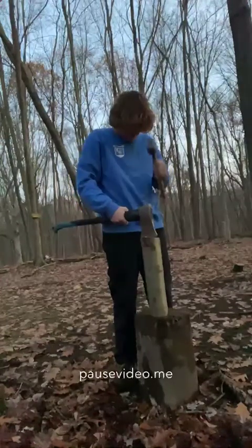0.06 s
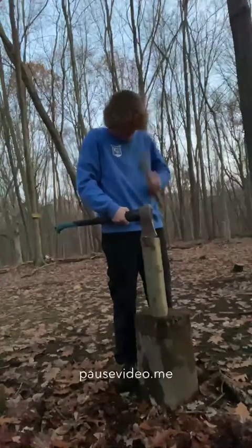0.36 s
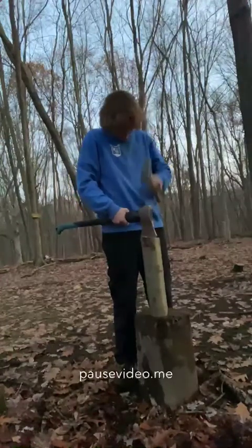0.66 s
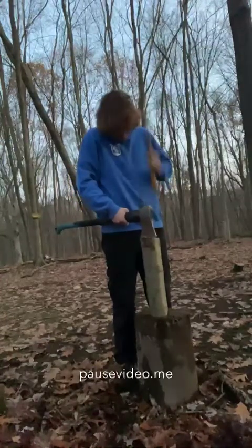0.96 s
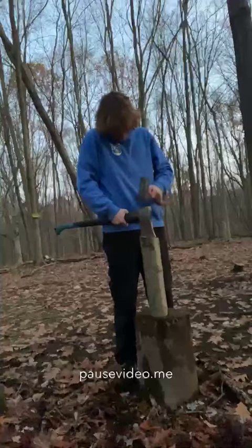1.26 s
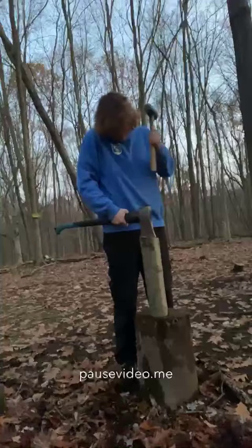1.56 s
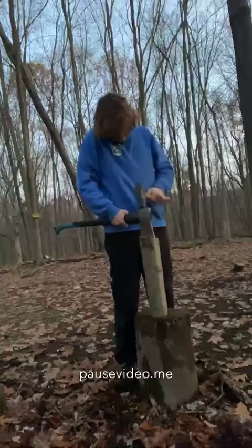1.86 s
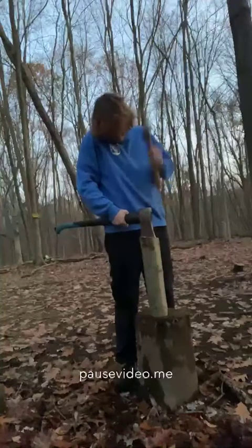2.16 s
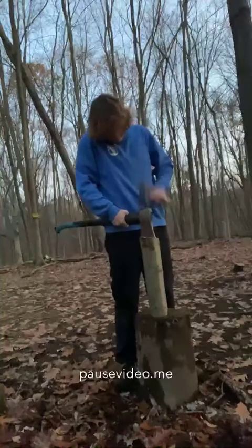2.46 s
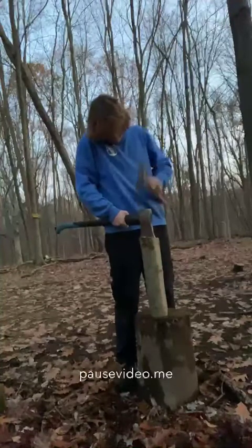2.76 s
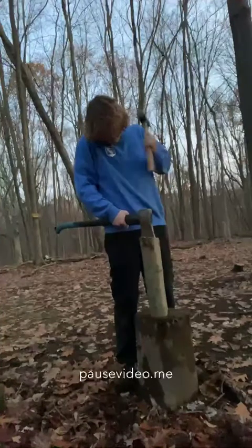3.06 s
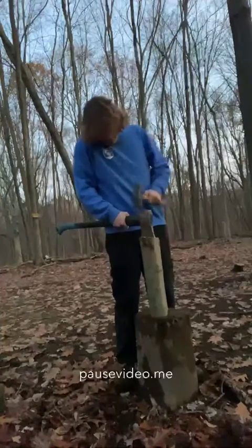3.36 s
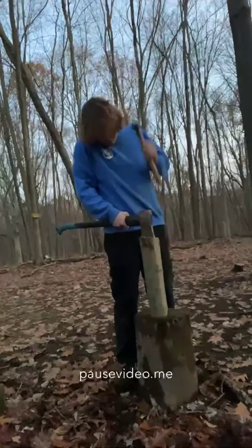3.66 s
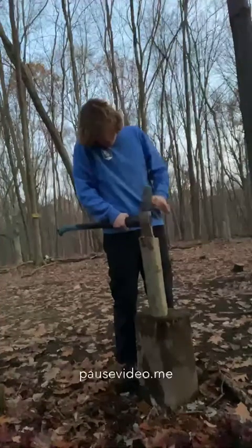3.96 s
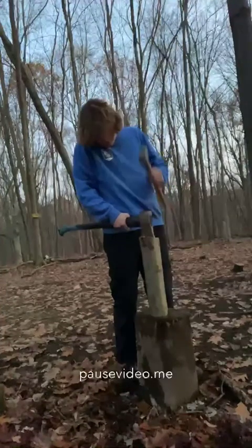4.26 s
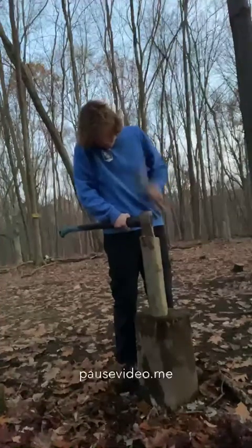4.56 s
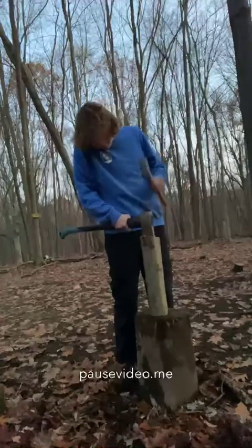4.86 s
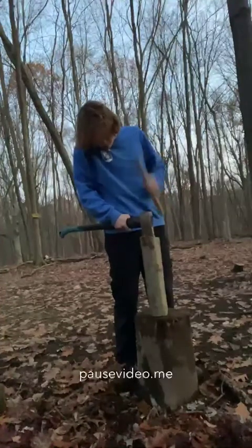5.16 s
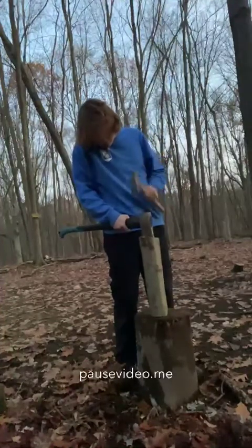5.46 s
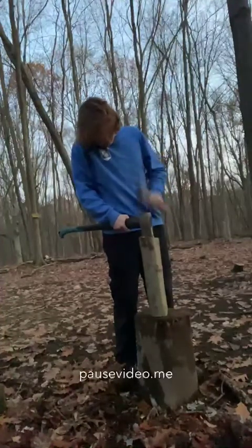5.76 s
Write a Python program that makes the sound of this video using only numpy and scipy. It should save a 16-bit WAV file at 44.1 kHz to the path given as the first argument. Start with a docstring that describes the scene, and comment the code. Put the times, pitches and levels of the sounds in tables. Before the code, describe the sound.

A hammer strikes an axe stuck in a log nine times, sharp, evenly spaced metallic cracks echoing through quiet woods.

```python
"""In bare autumn woods, a hammer strikes the back of an axe stuck in a log, nine times.
Each impact gives a steel crack and excites the damped modes of blade, axe head, handle and log;
the ground thuds and the trunks scatter the sound back. Dry leaves tick underfoot over a steady hush,
and the loosened handle knocks once after the last blow. A limiter briefly ducks the woods at each blow."""
import sys
import numpy as np
from scipy import signal
from scipy.fft import rfft, irfft
from scipy.io import wavfile
from scipy.ndimage import uniform_filter1d, minimum_filter1d

SR = 44100
rng = np.random.default_rng(int(sys.argv[2]) if len(sys.argv) > 2 else 0)


def unload_wav(signal):
    """Save mono or channel-first audio to the path in sys.argv[1] as 16-bit WAV at rate SR, clipped to [-1, 1]."""
    wavfile.write(
        sys.argv[1],
        SR,
        np.round(np.clip(np.atleast_2d(signal).T, -1, 1) * 32767).astype(np.int16),
    )


N = 260788

# modes of the axe handle: pitch_hz, level_db, t60_s
HANDLE_MODES = [(636, -11, 0.041), (803, -17.5, 0.031), (986, -2.5, 0.048), (1256, 0.5, 0.033)]


def amp(db):
    """Decibels to amplitude ratio."""
    return 10 ** (np.asarray(db) / 20)


def unit(x):
    """Normalisation to rms 1."""
    return x / np.sqrt(np.mean(x ** 2) + 1e-20)


def read(points, hz):
    """Linear interpolation over log frequency."""
    f, value = np.transpose(points)
    return np.interp(np.log(hz + 1), np.log(f), value)


def add(mix, start_s, sound):
    """Superposition of a sound on the mix."""
    part = mix[max(round(start_s * SR), 0):][:len(sound)]
    part += sound[:len(part)]


def noise(spectrum, size):
    """Spectral shaping of white noise, at rms 1."""
    gain = amp(read(spectrum, np.fft.rfftfreq(size, 1 / SR)))
    return unit(irfft(rfft(rng.standard_normal(size)) * gain, size))


def fade(t, t60):
    """Exponential decay: 60 dB in t60 seconds."""
    return np.exp(-np.log(1000) * t / t60)


def ring(modes, t, rise_s, detune=0., sustain=1., rough=0., flutter_hz=170):
    """Damped modes: the spot struck shifts their pitch, grinding wood modulates their phase."""
    out = 0
    lowpass = signal.butter(2, flutter_hz, fs=SR, output="sos")
    for hz, db, t60 in modes:
        turns = hz * (1 + detune * rng.standard_normal()) * t + rng.random()
        wobble = unit(signal.sosfilt(lowpass, rng.standard_normal(len(t))))
        out += amp(db) * fade(t, t60 * sustain) * np.sin(2 * np.pi * turns + rough * wobble)
    return out * (1 - np.exp(-t / rise_s))


def woods(level_db=-52):
    """Stationary noise: a far-off hush and a low rumble of air."""
    # spectra of hush and rumble: frequency_hz, density_db
    hush = [(150, -5), (300, -10.5), (450, -10.5), (670, -5.5), (1000, 0.5), (1250, -1.5), (1600, 4),
            (2050, -10.5), (2700, -12.5), (4200, -21.5), (5800, -19.5), (7200, -33.5), (9000, -43.5),
            (16000, -70.5)]
    rumble = [(20, -36), (35, -17.5), (50, -2), (62, 4.5), (80, 1.5), (110, -0.5), (160, -15), (240, -24.5),
              (400, -52.5)]
    return amp(level_db) * (noise(hush, N) + noise(rumble, N))


def leaf():
    """Brittle fracture: a dry leaf snaps with a tiny bright tick."""
    t = np.arange(SR // 8) / SR
    return noise([(2000, -20), (6000, -3), (9000, 0), (12000, -5), (16000, -25)], len(t)) * fade(t, .025)


def trunks(t, bright_db, shimmer_db, shimmer_hz=5850, shimmer_width_hz=450):
    """Multiple scattering: dense echoes from leaves and near trunks, then far ones; treble dies first."""
    # spectrum of the scattered sound: frequency_hz, density_db
    echo_spectrum = [(150, -23), (450, -21.5), (900, -10.5), (1500, 1.5), (2100, -1.5), (3000, -2),
                     (4400, -4), (5600, 2.5), (7400, -5), (8900, 1), (9800, -19.5), (11000, -3.5),
                     (13000, -25.5), (16000, -23)]
    # reverberation time among the trunks: frequency_hz, t60_s
    decay_times = [(500, 0.91), (1500, 1), (3000, 0.99), (5500, 0.72), (8500, 0.55), (12000, 0.21),
                   (16000, .5)]
    hz, frame_s, bands = signal.stft(noise(echo_spectrum, len(t)), SR, nperseg=256)
    colour_db = bright_db * read([(4000, .13), (9000, 1)], hz)
    colour_db += shimmer_db * np.exp(-((hz - shimmer_hz) / shimmer_width_hz) ** 2)
    far = fade(frame_s, read(decay_times, hz)[:, None])
    near = amp(-1) * fade(frame_s, .27)
    _, tail = signal.istft(bands * amp(colour_db)[:, None] * (far + near), SR, nperseg=256)
    return tail[:len(t)] * (1 - np.exp(-t / .0056))


def ground(t, hz=62, level_db=-24, delay_s=.022, rise_s=.0076, t60=.2):
    """Propagation delay: the log rocks on soft soil and the thud travels slowly through the ground."""
    late = np.maximum(t - delay_s, 0)
    envelope = (1 - np.exp(-late / rise_s)) * fade(late, t60)
    return -amp(level_db) * envelope * np.sin(2 * np.pi * hz * late)


def knock():
    """Weak impact: the loose handle shifts in the eye, setting handle and blade ringing."""
    t = np.arange(SR // 4) / SR
    handle = amp(-10.5) * ring(HANDLE_MODES, t, rise_s=.00069, sustain=4.2)
    return handle + blade(t, 1330, swell_s=.0039, steep=1.2)


def blade(t, hz, swell_s=.0048, steep=5.5, after_db=-8, after_t60=.022):
    """Bending vibration: the note swells for a few cycles, then the gripping wood damps it."""
    burst = (t / swell_s * np.exp(1 - t / swell_s)) ** steep
    after_ring = amp(after_db) * fade(t, after_t60) * (1 - np.exp(-t / swell_s))
    return (burst + after_ring) * np.sin(2 * np.pi * hz * t)


def by_aim(square, glancing_db, flat_db):
    """Level interpolated between a glancing hit (square = 0) and a flat one (1)."""
    return glancing_db + (flat_db - glancing_db) * square


def log_knock(t, square):
    """Energy transfer: a flatter hit drives the log's heavily damped modes harder."""
    # modes of the log: pitch_hz, level_db, t60_s
    log_modes = [(115, -6, 0.057), (176, -1, .045), (315, 0, .035), (445, -0.5, 0.031), (676, 0.5, .035)]
    return amp(by_aim(square, -19.5, -11.5)) * ring(log_modes, t, rise_s=.0019, detune=.02)


def steel(t, square, clink_db, glancing_below=.2):
    """Free vibration of steel: the axe head clinks; only a glancing hit rings the hammer's head."""
    # middle and high modes of the axe head, and the hammer's mode: pitch_hz, level_db, t60_s
    clink_modes = [(2240, -10, .065), (2745, -7, .055), (3100, -4, .05), (3810, -3, .045), (4710, -9, .03),
                   (5420, -2, .035), (5650, -2, .035), (6260, -11, .05), (6680, -10, .045)]
    ting_modes = [(7150, -10, .045), (8450, -5, .04), (8760, -2, .02), (8900, -2, .04)]
    hammer_mode = [(10660, 0, .24)]
    clink = amp(clink_db) * ring(clink_modes, t, rise_s=.00021, detune=.003, sustain=.79, rough=.75)
    ting = amp(by_aim(square, -16.5, -5)) * ring(ting_modes, t, rise_s=.00024, detune=.0027, rough=.75)
    hammer = amp(-31.5) * ring(hammer_mode, t, rise_s=.0003, rough=.5)
    return clink + ting + (square < glancing_below) * hammer


def crack(t, bite_s=.014):
    """Broadband impact of steel on steel: a contact tick, a burst as the blade bites, a weaker rattle."""
    # spectrum of burst and rattle: frequency_hz, density_db
    crack_spectrum = [(150, -13), (500, -7.5), (900, -16.5), (1500, 16.5), (2100, -2.5), (3200, 1.5),
                      (4400, 1), (5600, 5.5), (7400, -14.5), (9000, -23), (10500, -8.5), (12500, -28),
                      (15500, -19.5), (17000, -43)]
    tick_spectrum = [(1500, -24), (5000, 0), (10000, -11.5), (12500, -24.5), (17000, -32.5)]
    tick = amp(5) * noise(tick_spectrum, len(t)) * fade(t, .0052)
    burst = fade(t, .032) / (1 + (t / bite_s) ** 6)
    rattle = amp(-13) * fade(t, .11)
    return tick + noise(crack_spectrum, len(t)) * (burst + rattle)


def blow(square, blade_hz, blade_db, handle_db, clink_db):
    """One hammer blow as direct sound, early reflections and reverberation; the aim sets its timbre."""
    echo_t = np.arange(SR) / SR
    t = echo_t[:SR // 2]
    looseness = 1.05 * amp(.11 * handle_db)  # a louder handle is gripped less and rings longer
    note = amp(blade_db) * blade(t, blade_hz)
    note += amp(handle_db) * ring(HANDLE_MODES, t, .002, detune=.0036, sustain=looseness, rough=.47)
    direct = note + amp(by_aim(square, -3.5, .5)) * crack(t)
    direct += log_knock(t, square) + steel(t, square, clink_db)
    bright_db = by_aim(square, -9.5, 2.5)  # a flat hit radiates more treble
    shimmer_db = 4 + 1.3 * clink_db  # the echo's shimmer follows the clink
    out = amp(-29.5) * trunks(echo_t, bright_db, shimmer_db)  # the scattered crack
    note_echo = signal.fftconvolve(note, trunks(echo_t, bright_db, shimmer_db))
    add(out, 0, amp(-70.5) * note_echo)
    add(out, 0, direct + ground(t))
    for delay_s, level_db in [(.0035, -17.5), (.0178, -30)]:  # off the ground and a near surface
        add(out, delay_s, amp(level_db) * direct)
    return out


def scene():
    """Superposition of nine blows, a knock and leaf ticks on the quiet woods."""
    # hammer blows: start_s, force_db, squareness (0 to 1), blade_hz, blade_db, handle_db, clink_db
    blows = [(0.443, -1, .45, 1490, -2, -5, 1.5), (1.0742, 2, 0.79, 1500, -1, -4.5, -3.5),
             (1.7835, 2, 0.74, 1512, -4.5, -20.5, -8), (2.4933, 1, .8, 1530, 1.5, -1.5, -7.5),
             (3.24, 0, .4, 1564, 8, -2.5, -5), (3.9519, -1.5, 0.6, 1503, 6.5, -3, -5.5),
             (4.6201, 0, .1, 1467, 4.5, -9.5, -1.5), (5.2568, 0, .05, 1589, 5, -0.5, -3),
             (5.8035, 2, 0.32, 1472, 0.5, 1, -5)]
    # the handle's knock and the leaf ticks: start_s, level_db
    knocks = [(5.849, -21)]
    leaves = [(3.689, -65), (3.8994, -72), (4.3294, -71), (4.3594, -65), (5.0477, -63), (5.089, -73.5)]
    mix = woods()
    for start_s, force_db, *strike in blows:
        add(mix, start_s, amp(force_db) * blow(*strike))
    for start_s, level_db in knocks:
        add(mix, start_s, amp(level_db) * knock())
    for start_s, level_db in leaves:
        add(mix, start_s, amp(level_db) * leaf())
    return mix[None]


def limiter(x, ceiling_db=-.6, hold_s=.07, recover_db_per_s=130):
    """Peak limiting: the gain drops at once to meet the ceiling, holds, then recovers."""
    over_db = np.maximum(20 * np.log10(abs(x) + 1e-9) - ceiling_db, 0)
    half = int(hold_s * SR / 2)
    held_db = -minimum_filter1d(-over_db, 2 * half + 1, origin=half, mode="constant")
    recovery_db = np.arange(N) * recover_db_per_s / SR
    duck_db = np.maximum.accumulate(held_db + recovery_db) - recovery_db
    ahead_db = -minimum_filter1d(-duck_db, size=25)  # a short look-ahead rounds the gain step
    return x * amp(-uniform_filter1d(ahead_db, size=25))


def record(dry):
    """Soft saturation in the microphone, peak limiting, then frequency response and band limit."""
    # microphone response: frequency_hz, gain_db
    response = [(10, -30), (25, -7), (45, 0), (11000, 0), (13000, -6), (16500, -7)]
    headroom, edge_hz = amp(14.5), 16200
    limited = limiter(headroom * np.tanh(dry[0] / headroom))
    gain = amp(read(response, np.fft.rfftfreq(2 * N, 1 / SR)))
    coloured = irfft(rfft(limited, 2 * N) * gain)[:N]
    lowpass = signal.firwin(255, edge_hz, window=("kaiser", 9), fs=SR)
    return signal.oaconvolve(coloured, lowpass, "same")[None]


dry = scene()
out = record(dry)
unload_wav(out)
```